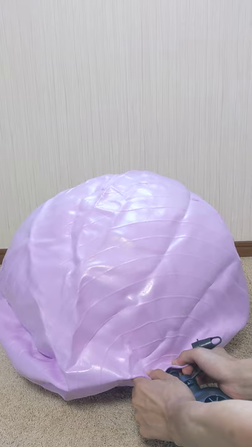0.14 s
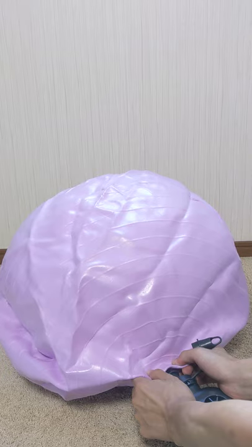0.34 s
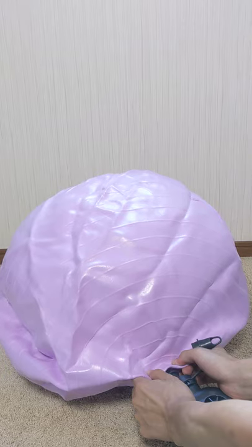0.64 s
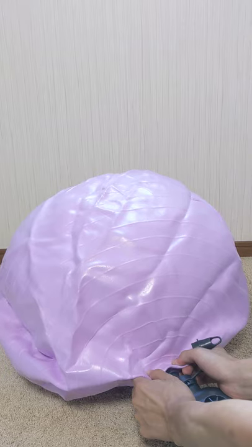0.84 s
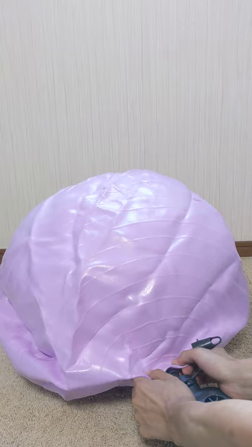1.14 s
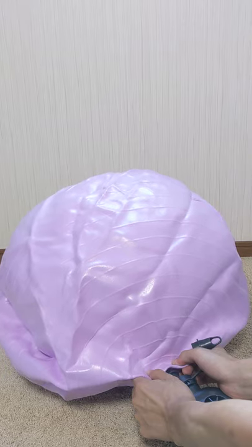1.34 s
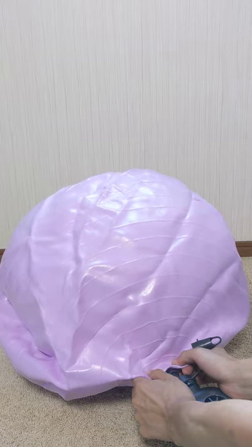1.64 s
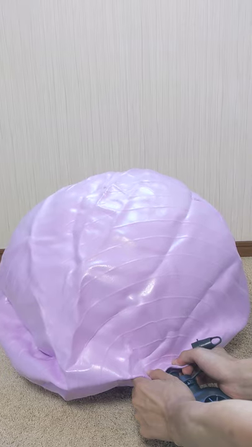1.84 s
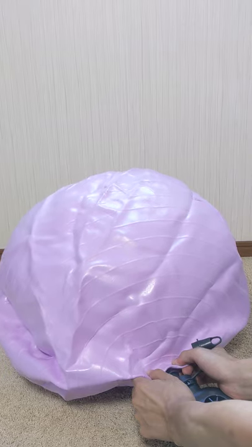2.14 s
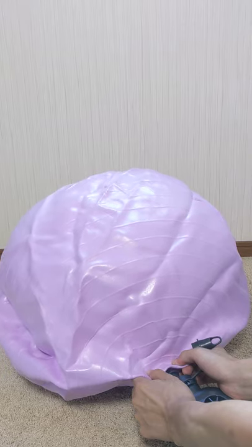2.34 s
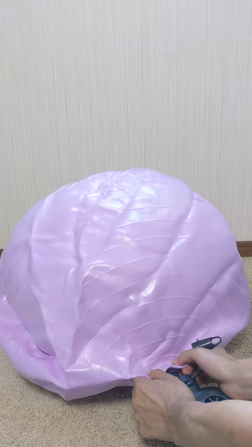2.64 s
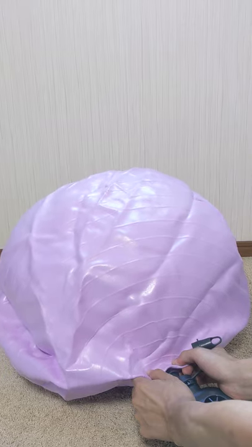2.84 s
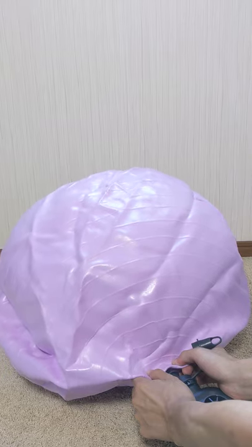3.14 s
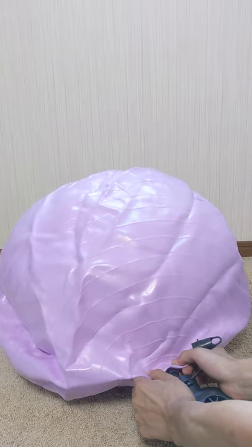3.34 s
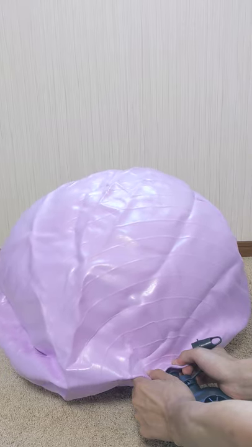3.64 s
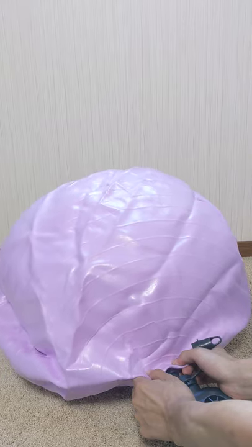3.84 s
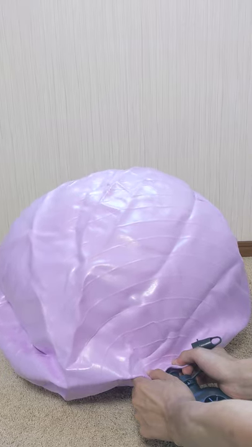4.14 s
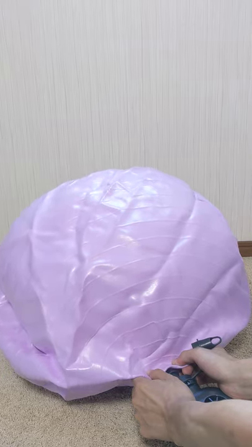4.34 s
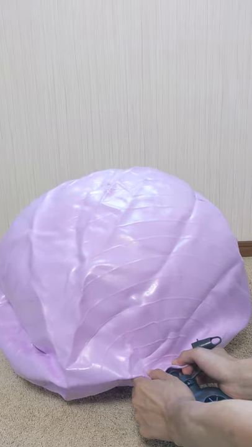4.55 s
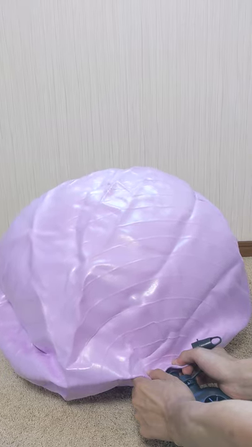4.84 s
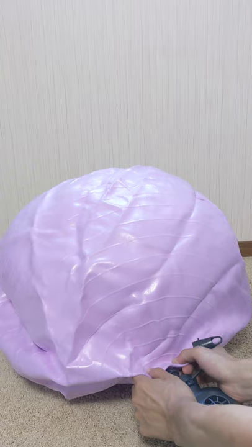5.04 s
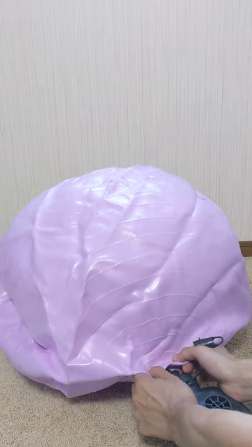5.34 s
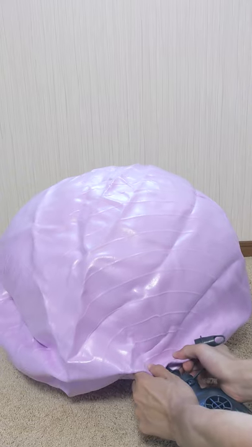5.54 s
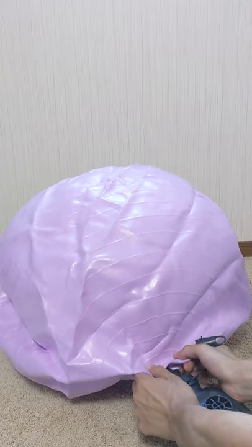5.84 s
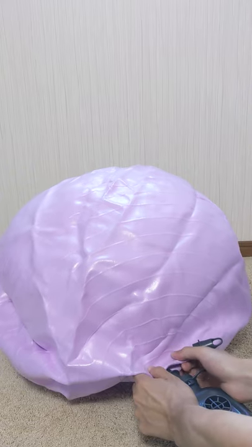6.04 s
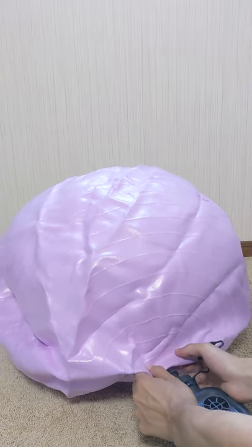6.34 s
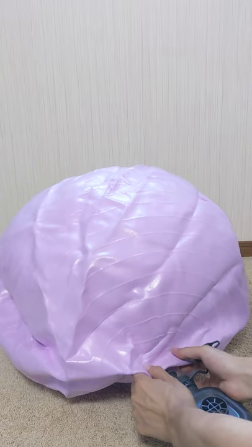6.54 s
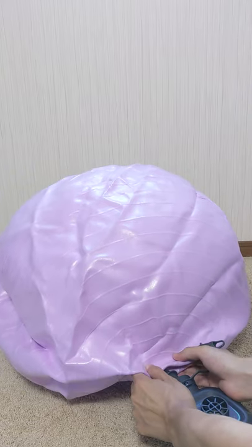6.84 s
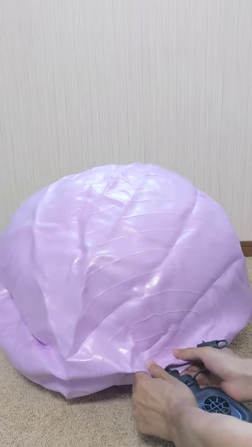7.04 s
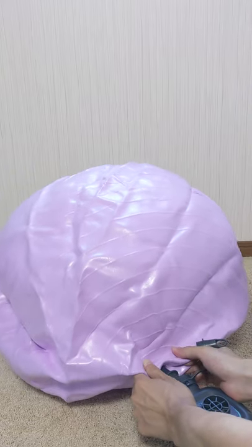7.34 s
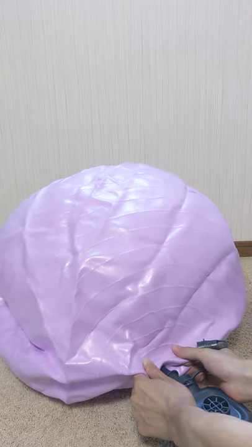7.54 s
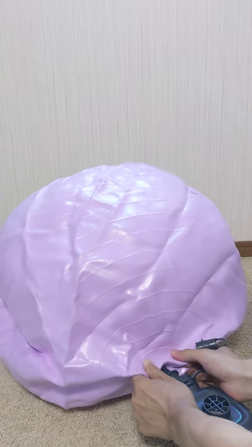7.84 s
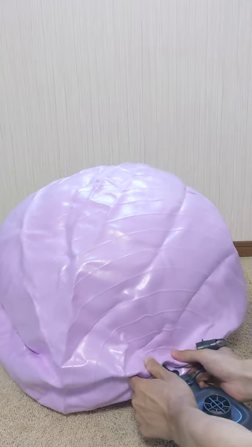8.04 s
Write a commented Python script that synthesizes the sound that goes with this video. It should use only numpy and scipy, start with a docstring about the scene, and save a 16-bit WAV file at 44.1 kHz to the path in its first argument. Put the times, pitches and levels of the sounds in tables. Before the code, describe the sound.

A small electric pump runs nonstop, a thin high whine over motor hum and a broad rush of air filling a vinyl ball indoors.

```python
"""A thin electric whine leads, over a motor hum and a broad rush of air: a small pump fills a vinyl ball.
Place: the carpet of a room, near a wall, heard by two microphones. Ten impeller blades chop the air
into the whine's harmonics; one uneven shaft drives them and the motor tones. Shaped noise is the air rush.
The motor sags a little under load, and the overtones swell and fade as hands shift the pump."""
import sys
import numpy as np
from scipy import signal
from scipy.fft import next_fast_len
from scipy.io import wavfile
from scipy.ndimage import uniform_filter1d

SR = 44100
rng = np.random.default_rng(int(sys.argv[2]) if len(sys.argv) > 2 else 0)


def to_wav(s):
    """Save 16-bit WAV."""
    ch = np.atleast_2d(s).T  # columns
    pcm = np.round(np.clip(ch, -1, 1) * 32767)  # PCM
    wavfile.write(sys.argv[1], SR, pcm.astype(np.int16))


N = 362061

BLADES = 10
RIPPLE_HZ = 120  # half waves of the mains
TURN_START_S, TURN_END_S = 3.22, 4.37  # the pump lies still, then is turned

# Whine at the left microphone before swells and fading, a row a harmonic, blade tone first:
# before_db, after_db, change_start_s, change_end_s
WHINE_LEFT = [(-33.5, -22.5, 4.66, 5.46), (-32, -22, 3.7, 4.2), (-31.5, -27, 6.7, 6.95),
              (-21.5, -43, 2.6, 8), (-29.3, -39, 2.5, 3.7)]
# The same at the right microphone: before_db, after_db, change_start_s, change_end_s
WHINE_RIGHT = [(-18.5, -24, 3.08, 4.3), (-24, -29, 6.45, 7.8), (-29.5, -43, 2.8, 6.9),
               (-36.5, -50, 4.5, 7.9), (-46, -49, 3.0, 5.0)]
# Phase lead of the left side, a row a harmonic: before_turn_rad, after_turn_rad
WHINE_LEADS = [(-2.5, 0.47), (4.5, -.6), (3.5, -0.37), (1.5, 1.36), (0.4, .9)]


def whine(t, angle, flutter=0.045, skirt=0.048, fading_db=0.57):
    """Blades chop the air; eddies flutter each harmonic, and standing waves fade it once the pump turns."""
    out = np.zeros((2, N))
    turned = ease(t, TURN_START_S, TURN_END_S)
    harmonics = zip(WHINE_LEFT, WHINE_RIGHT, WHINE_LEADS)
    for k, (left, right, (lead_before, lead_after)) in enumerate(harmonics, 1):
        # flutter, skirt and fading all grow with the harmonic's number
        tone = np.exp(1j * k * BLADES * angle)
        tone = tone * (1 + k * skirt * wander(width_hz=220))
        lead = lead_before + (lead_after - lead_before) * turned
        swell_db = swell(t, k)
        for side, (before_db, after_db, start, end) in enumerate([left, right]):
            db = before_db + ease(t, start, end, after_db - before_db) + swell_db[side]
            db += k * fading_db * turned * wander(width_hz=7.2).real
            sway = 1 + k * flutter * wander(width_hz=26)
            out[side] += gain_of(db) * (tone * sway * np.exp(-1j * side * lead)).real
    return np.sqrt(2) * out


# One harmonic swells or dips as hands move the pump through a standing wave:
# centre_s, length_s, harmonic, left_db, right_db
SWELLS = [(3.2, 0.52, 1, 10, -1), (3.228, 0.41, 3, -2, 9.5), (3.248, 0.88, 2, 10, 4.5),
          (3.35, 0.77, 4, 2.5, 0), (3.57, .3, 5, 11, 0), (3.72, .4, 2, -4.5, -3.5), (3.867, 0.27, 3, -2, 8),
          (3.997, 0.43, 1, -17, -2.3), (5.38, .45, 3, -4, 10), (5.45, .35, 5, 8, 0),
          (5.48, 0.25, 2, -0.5, 4), (5.87, 0.28, 4, 8, -2), (6.255, 0.23, 1, -1, 4),
          (6.66, 0.35, 1, -5.5, -1), (6.78, 0.46, 4, 14, 6), (7.0, .32, 1, 0, 5), (8.147, 0.6, 1, 2, 5.5)]


def swell(t, harmonic):
    """Sums the smooth level bumps, left and right in dB, that standing waves give one harmonic."""
    total_db = np.zeros((2, N))
    for centre, length, number, left_db, right_db in SWELLS:
        if round(number) == harmonic:
            bump = np.exp(-(2 * (t - centre) / length) ** 2)
            total_db += np.outer([left_db, right_db], bump)
    return total_db


# Motor speed, sagging as the load grows: time_s, blade_pitch_hz (blades passing a second)
SPEED = [(0.6, 2966), (3.44, 2969), (4.24, 2949), (5.08, 2946), (5.69, 2922), (8.15, 2923)]


def shaft_angle(t, jitter_rad=0.003, ripple_rad=0.0014):
    """The shaft turns a little unevenly; each half wave of the mains gives it a push."""
    shaft_hz = follow(SPEED, t) / BLADES
    steady = 2 * np.pi * np.cumsum(shaft_hz) / SR
    jitter = jitter_rad * wander(width_hz=14).real
    ripple = ripple_rad * np.sin(2 * np.pi * RIPPLE_HZ * t)
    return steady + jitter + ripple


# Unbalance, bearings and commutator: multiple of the shaft rate
MOTOR_ORDERS = [1, 2.4, 3, 4.42, 6, 7.21, 8]
# Strength of those tones, in the same sequence: left_db, right_db
MOTOR_LEVELS = [(-37.5, -37.5), (-40.5, -38), (-39, -38), (-30, -30.5), (-41, -49), (-45, -37.5),
                (-45, -54)]
# How alike the two microphones hear motor and air; below zero they move against each other:
# pitch_hz, likeness (-1 to 1)
LIKENESS = [(60, 0.91), (250, 1), (600, .97), (800, 0.83), (950, -.35), (1330, -.9), (1600, 0.42),
            (2100, 0.9), (3150, -0.13), (3950, -0.41), (5900, 0.55), (7850, -0.62), (9200, 0.043),
            (12500, 0.045)]


def motor(t, angle, hum_rough=0.14, rattle_rough=0.72):
    """A steady hum at the shaft rate under the more restless tones of the bearings."""
    out = np.zeros((2, N))
    for multiple, levels_db in zip(MOTOR_ORDERS, MOTOR_LEVELS):
        rough = hum_rough if multiple == 1 else rattle_rough
        tone = np.exp(1j * multiple * angle)
        tone = tone * (1 + rough * wander(width_hz=4.6)) / np.hypot(1, rough)
        # the likeness at the opening speed sets the phase between the sides
        start_hz = multiple * SPEED[0][1] / BLADES
        lead = np.arccos(np.clip(read(LIKENESS, start_hz), -1, 1))
        sides = np.array([tone, tone * np.exp(-1j * lead)]).real
        out += gain_of(levels_db)[:, None] * sides
    return np.sqrt(2) * out


# Rushing air before humps and room colour: pitch_hz, level_db (per Hz)
AIR = [(30, -95), (110, -81), (185, -64), (560, -60.5), (900, -55.5), (1250, -50), (1550, -57.5),
       (2500, -57), (3150, -61.5), (4750, -70), (7000, -67), (10300, -63), (12600, -58.5), (15500, -64.5)]
# Resonances of room and pump, and noise humps around the whine's harmonics:
# pitch_hz, width_hz, lift_db (negative dips)
HUMPS = [(205, 25.5, 3), (401, 70, 6), (496, 30, 3), (540, 32, 4.5), (605, 32, 5), (687, 39, 4.5),
         (771, 20, 8.5), (996, 93, 4.5), (1101, 54, 3), (1354, 75, 5.5), (1647, 100, 4), (1830, 68, 6),
         (2321, 260, 3.5), (3660, 294, 8), (5787, 1220, 12.5), (8140, 720, 8.5), (9410, 580, 5),
         (10886, 330, 4), (11980, 330, 3.5), (14200, 300, -5), (14650, 220, 4)]
# Level between the two microphones: pitch_hz, left_minus_right_db
SHADE = [(100, -0.5), (1400, 1), (2100, 2), (2450, 6.5), (3100, -1), (3800, -1), (5300, 0.5), (6400, -3),
         (8300, 1), (9200, -0.5), (10000, 21), (10800, 11), (12800, 15.5), (15300, 22)]


def air(t, patchy_db=0.96, buzz=0.057, sizzle_hz=13780, sizzle_width_hz=150, sizzle_db=2.6):
    """Turbulent noise, humped and throbbing with the motor; its hiss fades a few dB once the pump is turned."""
    noise = rng.standard_normal((2, N))
    hz, s, (a, b) = signal.stft(noise, SR, nperseg=4096, noverlap=3072)
    same = np.clip(read(LIKENESS, hz), -1, 1)[:, None]
    right = same * a + np.sqrt(1 - same ** 2) * b
    spectra = np.array([a, right * gain_of(-read(SHADE, hz))[:, None]])

    colour_db = read(AIR, hz)
    for centre_hz, width_hz, lift_db in HUMPS:
        colour_db = colour_db + lift_db / (1 + (2 * (hz - centre_hz) / width_hz) ** 2) ** 1.35

    # the roar moves the middle of the spectrum and the hiss its top; the bass moves least
    roar_db = ease(s, start=3.4, end=6.7, change=-1.1)
    hiss_db = ease(s, start=5.4, end=9, change=-3.2)
    roar_db = roar_db - roar_db.mean()
    hiss_db = hiss_db - hiss_db.mean()
    treble = np.clip((hz - 3500) / 6000, 0, 1)[:, None]
    above_bass = np.clip(hz / 1200, 0, 1)[:, None]
    flow_db = above_bass * (1 - treble) * roar_db + treble * hiss_db

    # a thin sizzle in the air jet grows
    sizzle_band = np.exp(-((hz[:, None] - sizzle_hz) / sizzle_width_hz) ** 2)
    flow_db += sizzle_band * (sizzle_db + ease(s, start=5.2, end=8.0, change=4.6))

    # random patches across pitch and time
    patches = uniform_filter1d(rng.standard_normal(a.shape), size=50, axis=0)
    patches = evened(uniform_filter1d(patches, size=4, axis=1))
    level_db = colour_db[:, None] + flow_db + patchy_db * patches
    spectra = spectra * room_colour(hz)[..., None] * gain_of(level_db)
    rush = signal.istft(spectra, SR, nperseg=4096, noverlap=3072)[1][:, :N]
    rush = np.sqrt(SR / 2) * rush  # from dB per Hz to sample level
    return rush * (1 + buzz * np.sin(2 * np.pi * RIPPLE_HZ * t))


def room_colour(hz, wall_s=0.0102, wall=0.393, scatter=0.17, decay_s=0.028, count=40):
    """The wall echo and scattered reflections comb the air rush, differently at each microphone."""
    delay_s = rng.uniform(0.00101, 0.03, (2, count))
    size = np.exp(-delay_s / decay_s) * rng.choice([-1, 1], delay_s.shape)
    size = scatter * size / np.linalg.norm(size, axis=1, keepdims=True)
    echoes = (size[..., None] * np.exp(-2j * np.pi * hz * delay_s[..., None])).sum(1)
    wall_delay_s = wall_s + np.array([[-0.00015], [0.00015]])  # left, right
    echoes += wall * np.exp(-2j * np.pi * hz * wall_delay_s)
    # echo strength by pitch in Hz; long waves form nodes instead
    reach = read([(1100, 0), (2000, 0.85), (5500, 1.64), (9500, 1.3), (14000, 0.12)], hz)
    comb = abs(1 + reach * echoes) / np.sqrt(1 + reach ** 2 * (wall ** 2 + scatter ** 2))
    return comb * gain_of(nodes(hz))


# The room's standing waves at each microphone, dips and a few lifts: pitch_hz, left_db, right_db
NODES = [(254, -2, -2), (376, -8, -6.5), (438, -6, -5.5), (562.6, -6.5, -3), (744, -0.5, -3.5),
         (856, -2.5, -13), (910, -10, -0.5), (975, -15, 1.5), (1081, -6.5, 8.5), (1087, 1, -6),
         (1360, -8, 2.5), (1442, -13, -2), (1590, 0, -5)]


def nodes(hz, width_hz=26):
    """Standing waves carve narrow dips, and some lifts, at each microphone."""
    total_db = np.zeros((2, len(hz)))
    for centre_hz, left_db, right_db in NODES:
        notch = np.exp(-(2 * (hz - centre_hz) / width_hz) ** 2 / 2)
        total_db += np.outer([left_db, right_db], notch)
    return total_db


def wander(width_hz):
    """Complex random drift of rms one, mostly slower than width_hz."""
    size = next_fast_len(N)
    hz = np.fft.fftfreq(size, 1 / SR)
    z = rng.standard_normal(size) + 1j * rng.standard_normal(size)
    return evened(np.fft.ifft(z / (1 + (hz / width_hz) ** 2))[:N])


def ease(t, start, end, change=1):
    """Moves smoothly from zero to change between start and end."""
    u = np.clip((t - start) / (end - start), 0, 1)
    return change * np.sin(np.pi / 2 * u) ** 2


def gain_of(db):
    """Decibels to amplitude."""
    return 10 ** (np.asarray(db) / 20)


def evened(x):
    """Scales to an rms of one."""
    return x / np.sqrt(np.mean(abs(x) ** 2) + 1e-20)


def read(points, hz):
    """Reads a spectrum on a log-frequency axis."""
    f, value = np.transpose(points)
    return np.interp(np.log(hz + 1), np.log(f + 1), value)


def follow(rows, t):
    """Reads a curve at the times t."""
    return np.interp(t, *np.transpose(rows))


def scene():
    """One shaft drives the whine and the hum; the air rushes beneath them."""
    t = np.arange(N) / SR
    angle = shaft_angle(t)
    return whine(t, angle) + motor(t, angle) + air(t)


def record(dry, edge_hz=15800):
    """The recorder's band limit: a steep low-pass."""
    low_pass = signal.firwin(801, edge_hz, window=("kaiser", 9), fs=SR)
    return signal.oaconvolve(dry, low_pass[None], "same")


dry = scene()
out = record(dry)
to_wav(out)
```